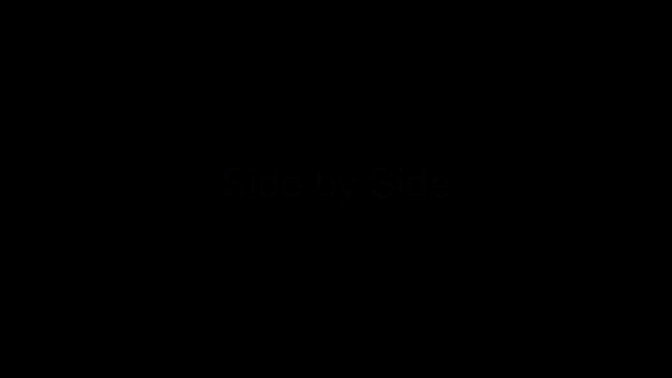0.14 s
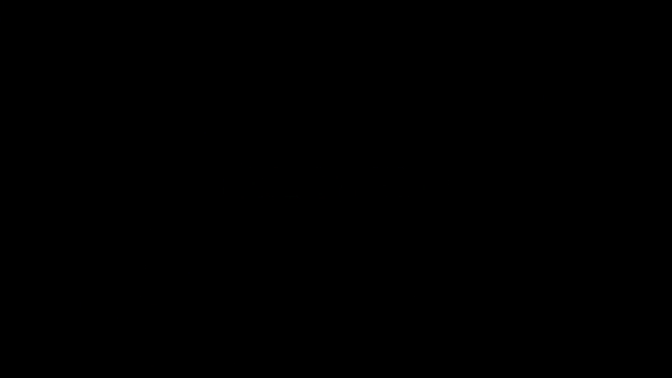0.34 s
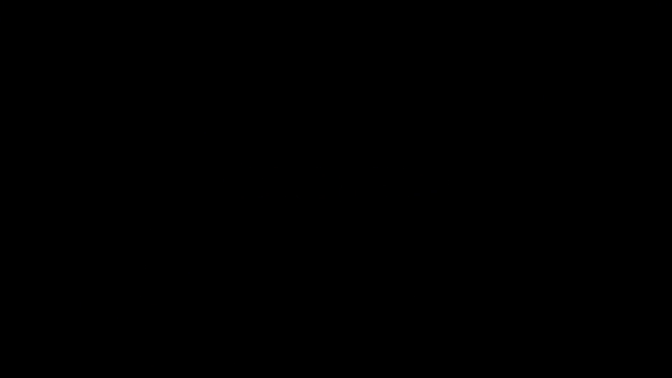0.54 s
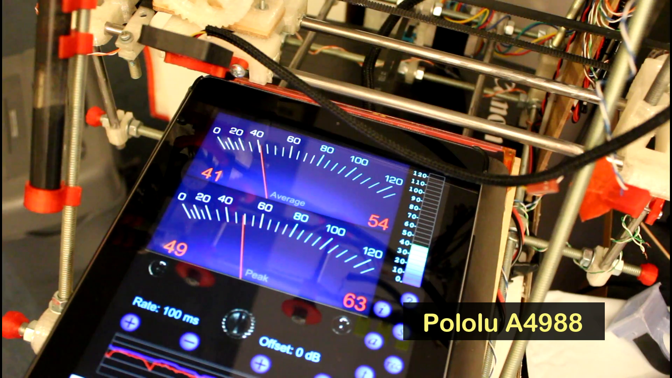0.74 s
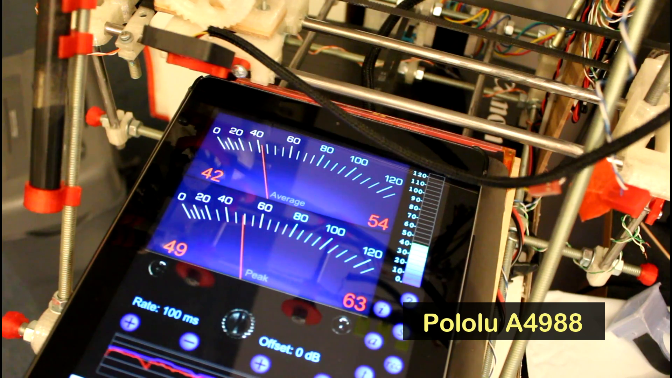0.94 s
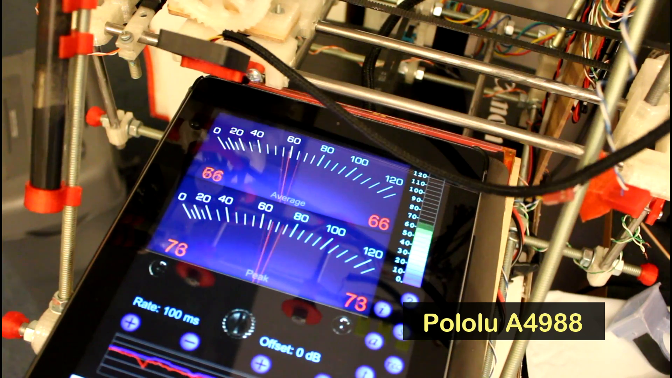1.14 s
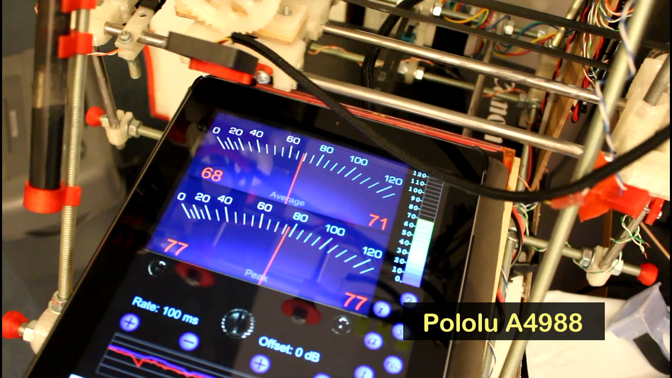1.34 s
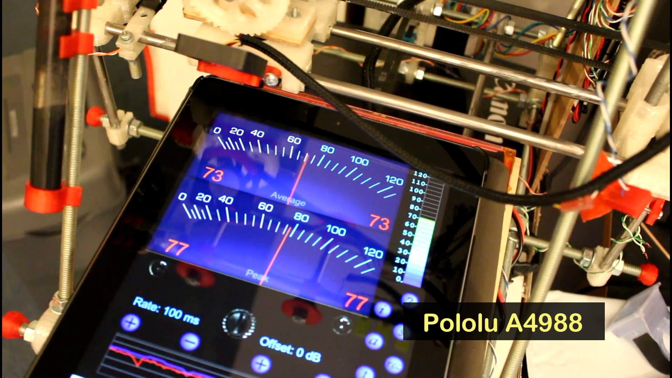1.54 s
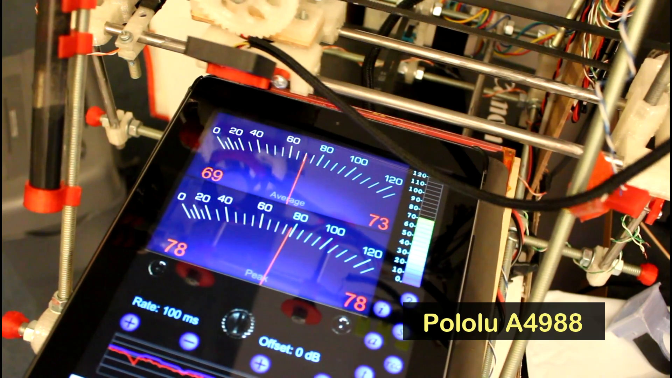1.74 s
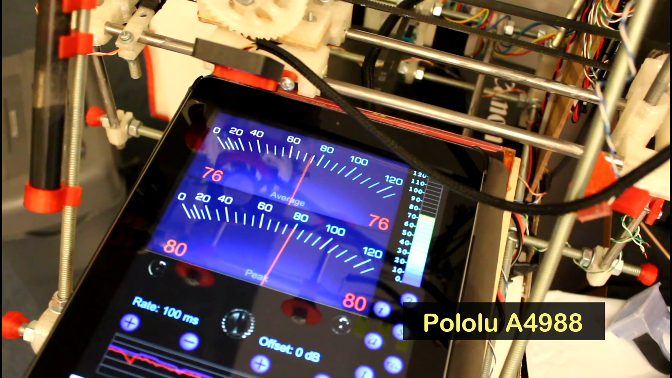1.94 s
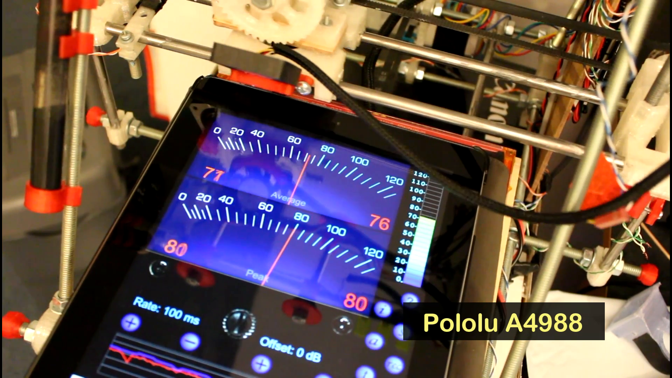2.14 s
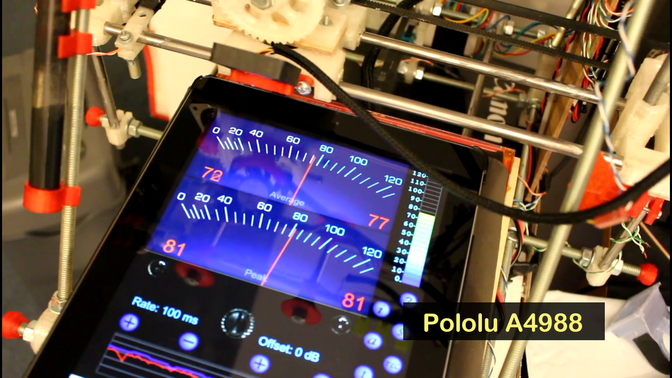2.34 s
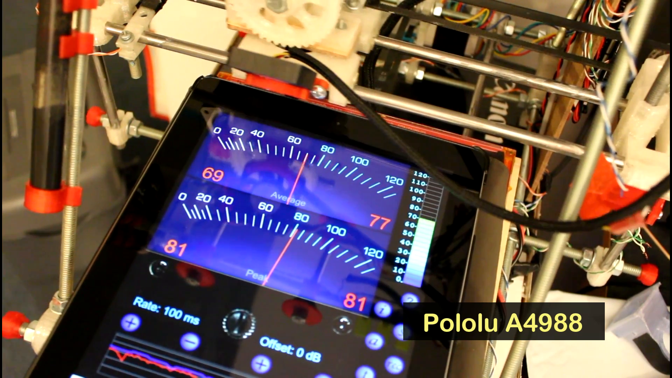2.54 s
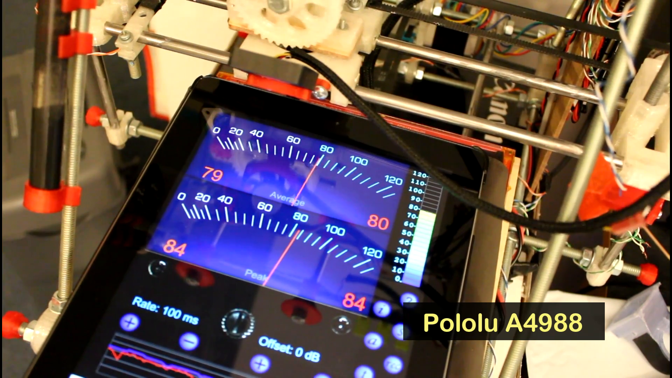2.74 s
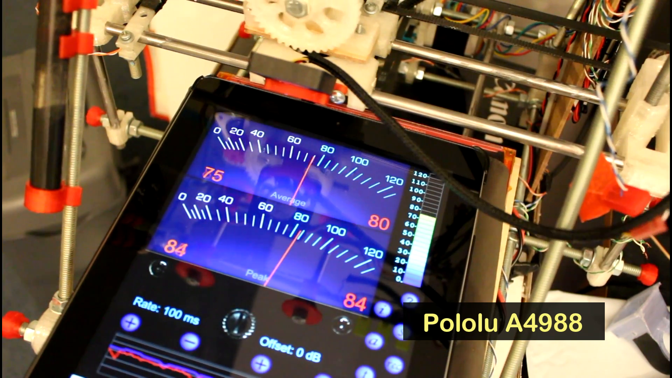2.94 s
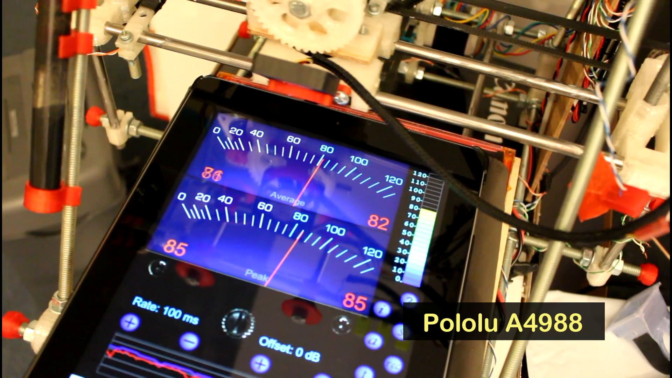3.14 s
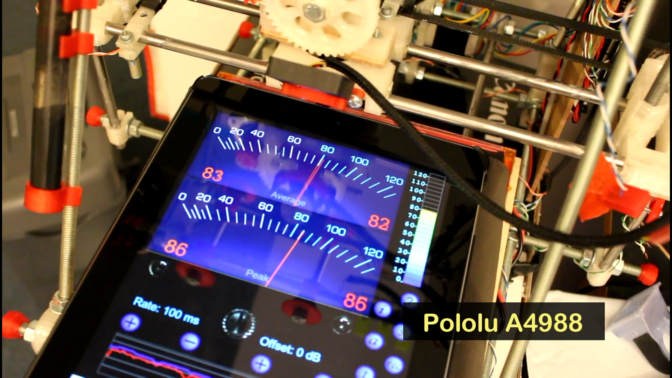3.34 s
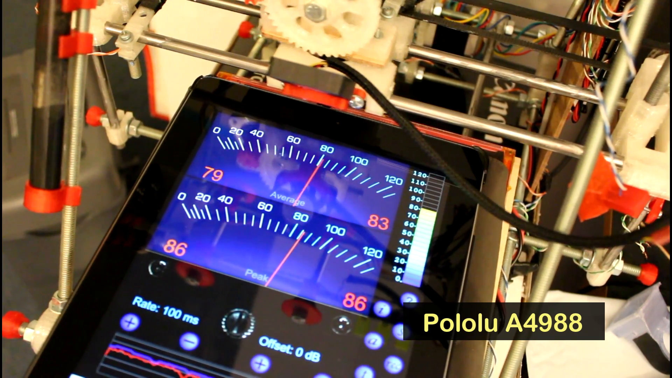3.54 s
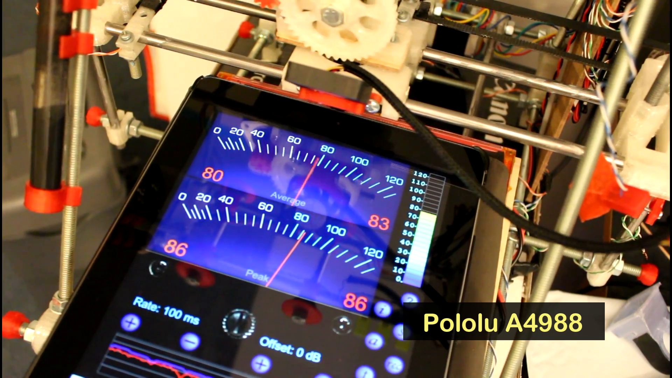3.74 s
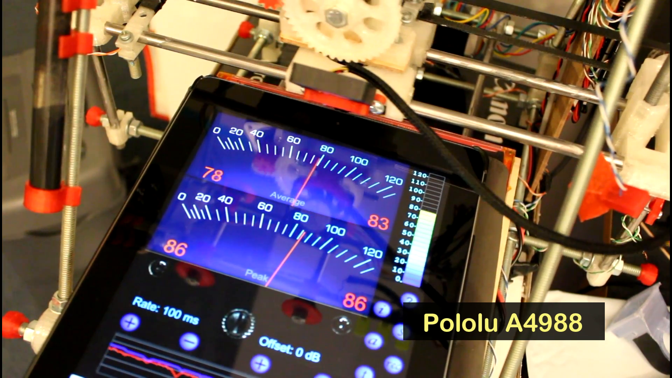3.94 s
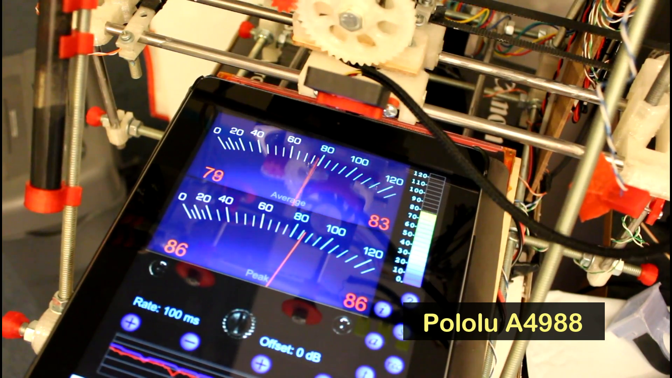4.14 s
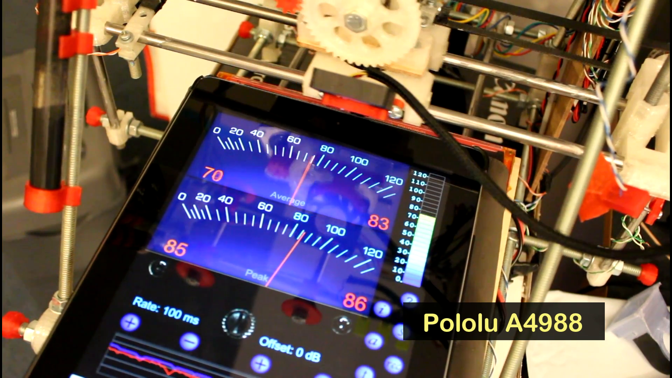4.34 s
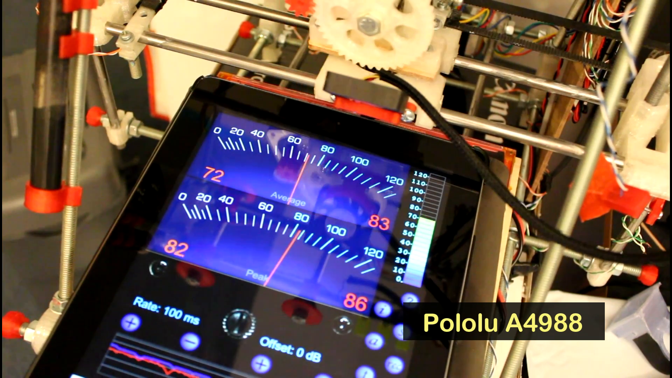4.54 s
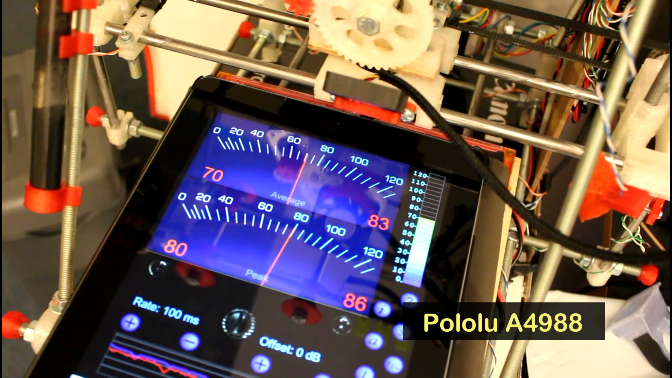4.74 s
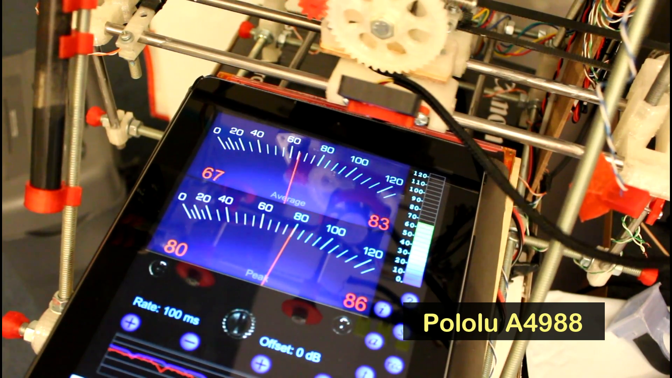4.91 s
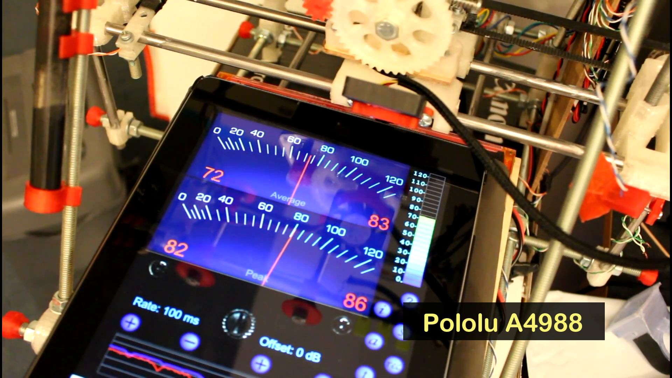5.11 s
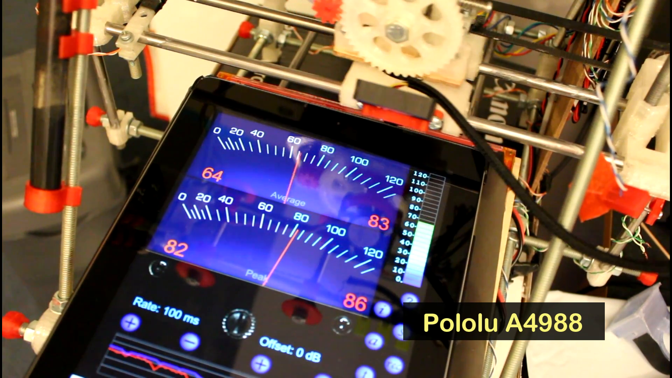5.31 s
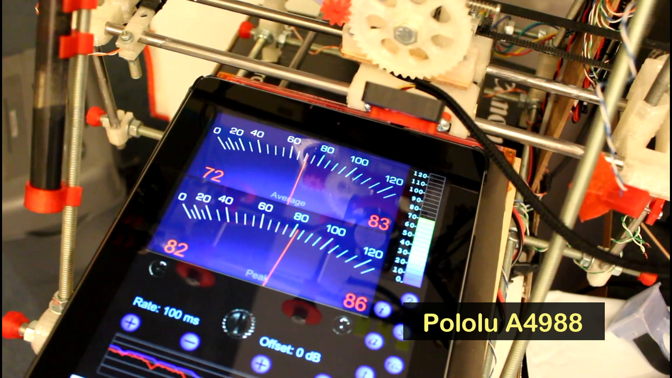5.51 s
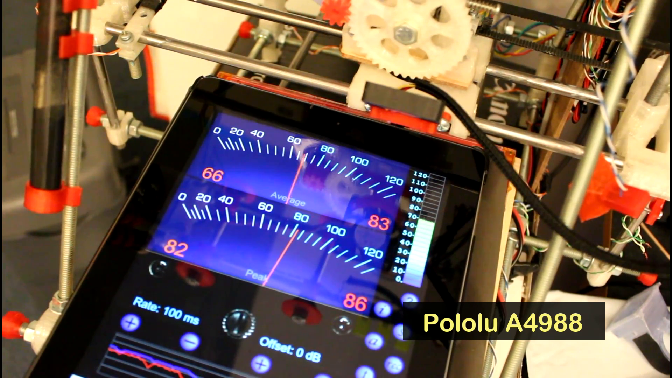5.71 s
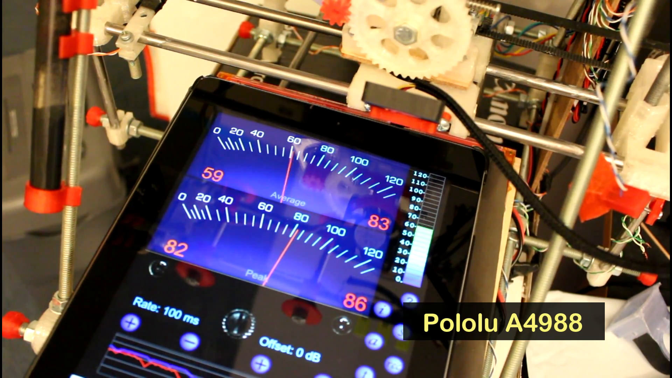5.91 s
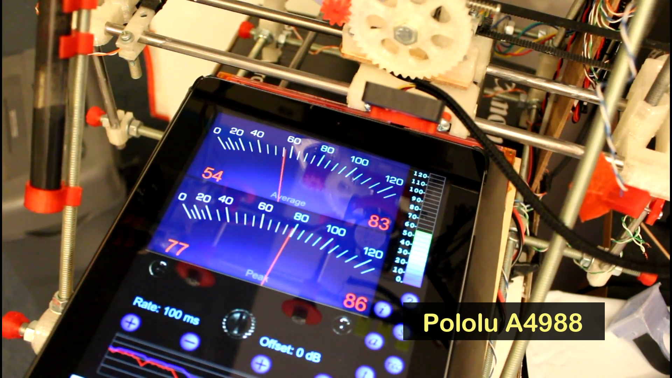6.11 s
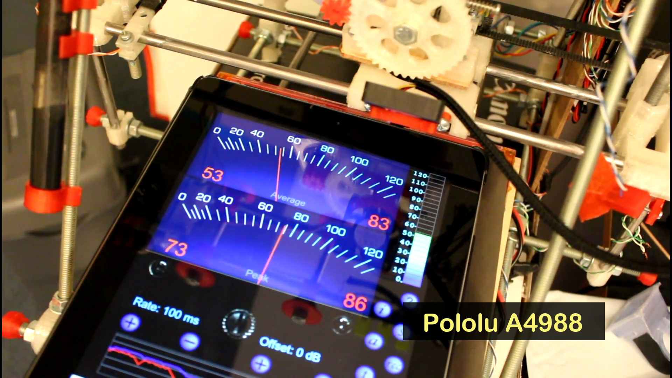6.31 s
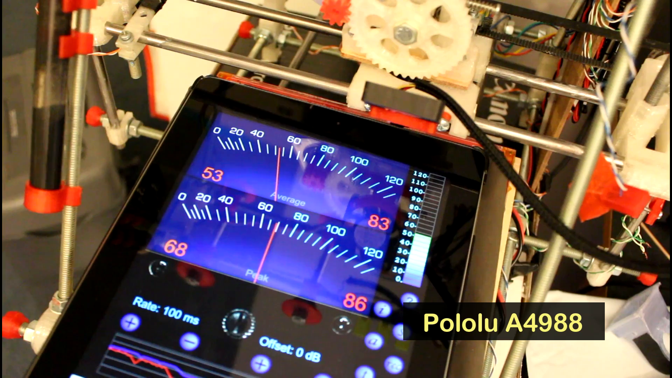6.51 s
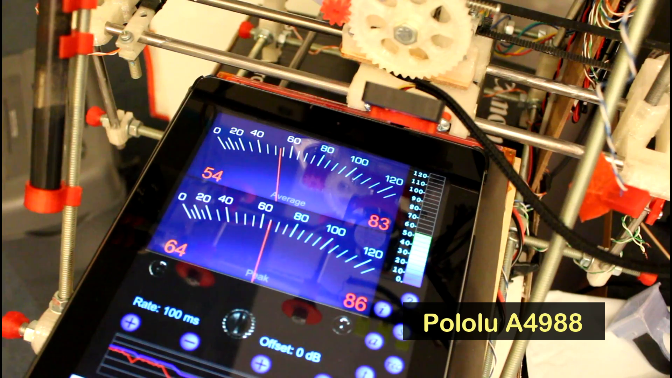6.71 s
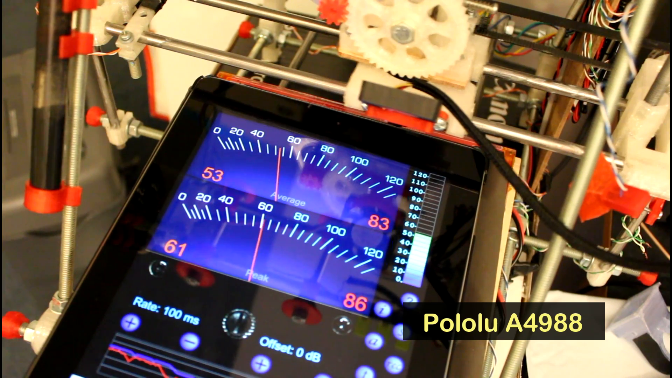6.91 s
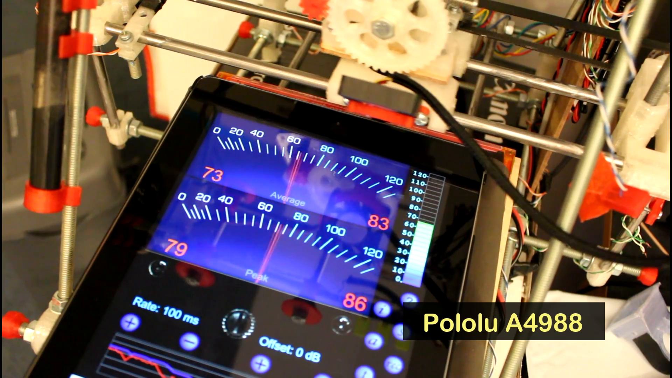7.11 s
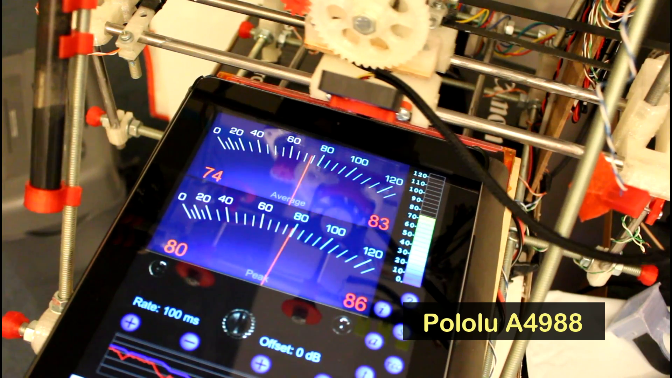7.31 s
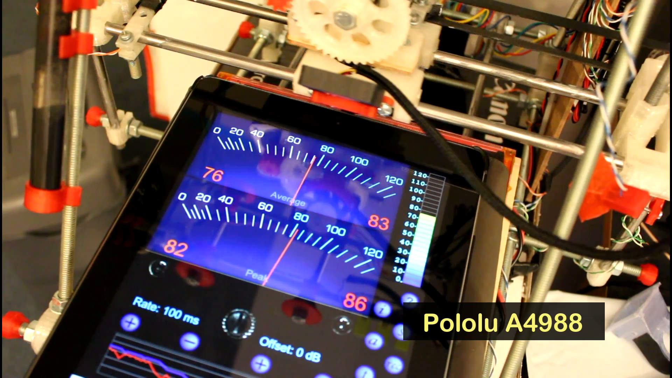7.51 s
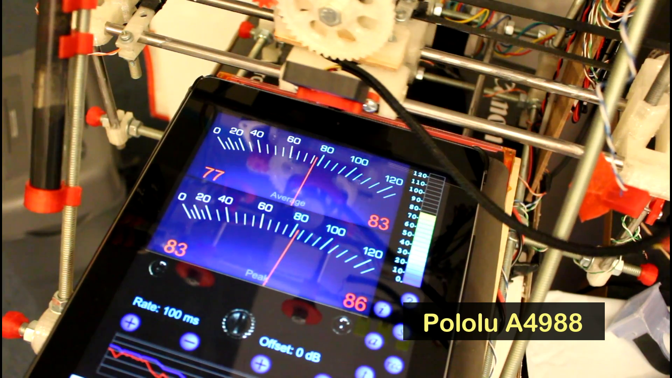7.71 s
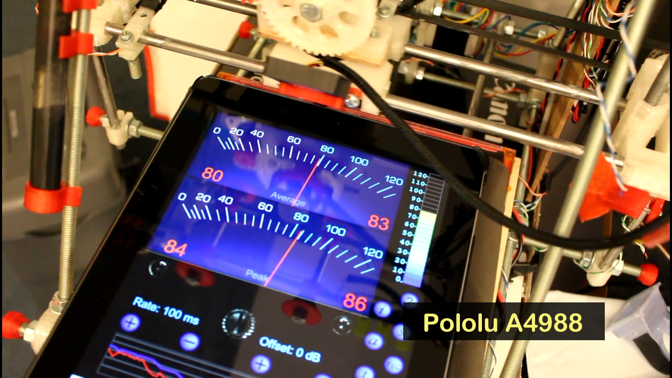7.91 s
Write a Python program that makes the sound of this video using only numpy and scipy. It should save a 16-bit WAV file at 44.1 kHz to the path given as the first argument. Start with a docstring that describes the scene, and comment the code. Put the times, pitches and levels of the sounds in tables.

```python
"""After a short silence a fan hums, a mouse clicks, and a stepper motor jogs a printer carriage on a rod frame.
Twelve short moves, a pause and one long move, still running at the end, each follow a click. Step-rate harmonics
sweep up through the frame's resonances and hold; the short moves sweep down again. The rotor shudders as speed
changes, bearings rattle as gated noise, and the motor driver hisses from the first move on.
A small room adds diffuse echoes in stereo."""
import sys
import numpy as np
from scipy import signal
from scipy.fft import rfft, irfft, next_fast_len
from scipy.io import wavfile
from scipy.ndimage import uniform_filter1d

SR = 44100
rng = np.random.default_rng(int(sys.argv[2]) if len(sys.argv) > 2 else 0)


def ratio(d):
    """dB to gain"""
    e = np.asarray(d, float) / 20
    return 10 ** e


def inscribe(sig):
    """Save sig as 16-bit PCM at rate SR to the path in sys.argv[1].

    A 1-D sig is mono; a 2-D sig holds one channel per row.
    Samples are clipped to [-1, 1] before scaling.
    """
    pcm = np.round(np.clip(np.atleast_2d(sig).T, -1, 1) * 32767)
    wavfile.write(sys.argv[1], SR, pcm.astype(np.int16))


N = 355446

# short moves; each leaves the carriage at a new place, where the frame passes the steps on differently:
# (button pressed [s], shudder at the start [dB], step tone [dB], second order [dB], fifth order [dB])
JOG_MOVES = [(0.9868, -46.5, -33.5, -45, -56.5), (1.316, -47.5, -34, -48.5, -60),
             (1.686, -51, -36, -52, -57), (2.0175, -51, -33, -52, -55.5), (2.423, -52, -35, -47, -55.5),
             (2.808, -51.5, -38, -46, -54), (3.1798, -50, -40.5, -47, -57),
             (3.5741, -50.5, -37.5, -47, -57), (3.9595, -47.5, -40.5, -45.5, -55.5),
             (4.367, -50, -40, -46, -56), (4.8259, -49.5, -42, -46.5, -61.5),
             (5.276, -49.5, -41, -45.5, -59.5)]
LONG_PRESS_S = 6.9416  # button pressed for the long move


def moves():
    """Motion schedule: start [s], time until braking [s] and first shudder [dB] of every move."""
    wait_s, jog_s, long_s = .0205, .215, 2.  # the motor turns wait_s after a press
    long_shudder_db = -50
    jogs = [(press_s + wait_s, jog_s, db) for press_s, db, *_ in JOG_MOVES]
    return jogs + [(LONG_PRESS_S + wait_s, long_s, long_shudder_db)]


def since_start():
    """Elapsed time: seconds since the latest move began, zero before the first."""
    t, starts = np.arange(N) / SR, np.array(moves())[:, 0]
    latest = np.maximum(np.searchsorted(starts, t) - 1, 0)
    return np.maximum(t - starts[latest], 0)


def speed(t):
    """Trapezoidal motion, as a share of full speed: a jerk, a ramp that settles on the steady run, a ramp down."""
    speed_up_s, settle_s, slow_down_s, jerk_share = .052, .015, .045, .15
    out = np.zeros(N)
    for start, run, _ in moves():
        up = jerk_share + (1 - jerk_share) * (t - start) / speed_up_s
        settle = 1 - .05 * np.exp(-np.maximum(t - start - speed_up_s, 0) / settle_s)
        down = 1 - (1 - jerk_share) * (t - start - run) / slow_down_s
        share = np.minimum(np.minimum(up, down), settle)
        out += share * (share >= jerk_share)
    return out


def place(t):
    """Position-dependent transmission: order levels [dB] fixed within each jog, gliding along the long move."""
    # along the long move: (time [s], step tone [dB], second order [dB], fifth order [dB])
    long_levels = [(7.05, -41.5, -47.5, -60), (7.25, -41, -48.5, -55), (7.57, -47, -51.5, -50.5),
                   (7.74, -41.5, -50.5, -45.5), (8.06, -44.5, -47.5, -46)]
    others_db, fifth_share = -7, .45
    jog = np.maximum(np.searchsorted(np.array(JOG_MOVES)[:, 0], t) - 1, 0)
    s, *long_columns = np.transpose(long_levels)
    jog_columns = np.transpose(JOG_MOVES)[2:]
    step_db, second_db, fifth_db = (np.where(t < LONG_PRESS_S, jog_column[jog], np.interp(t, s, long_column))
                                    for jog_column, long_column in zip(jog_columns, long_columns))
    # the other orders lie at a fixed distance from a mix of the step tone's and the fifth order's levels
    other_db = others_db + (1 - fifth_share) * step_db + fifth_share * fifth_db
    return step_db, second_db, fifth_db, other_db


def shape(x, points, peaks=()):
    """Spectral filtering: a (frequency [Hz], level [dB]) line with (frequency [Hz], width [Hz], level [dB]) humps."""
    size = next_fast_len(x.shape[-1])
    f = np.fft.rfftfreq(size, 1 / SR) + 1
    hz, db = np.transpose(points)
    line = ratio(np.interp(np.log(f), np.log(np.maximum(hz, 1)), db))
    humps = sum(ratio(d) / np.sqrt(1 + (2 * (f - c) / w) ** 4) for c, w, d in peaks)
    return irfft(rfft(x, size) * line * (1 + humps), size)[..., :x.shape[-1]]


def unit(x):
    """Normalisation to an rms of 1."""
    return x / np.sqrt(np.mean(x ** 2))


def walk(rate):
    """Band-limited random fluctuation of rms 1: held random values, rate of them a second, smoothed."""
    k = int(SR / rate)
    held = np.repeat(rng.standard_normal(N // k + 1), k)
    return unit(uniform_filter1d(held, k)[:N])


def frame(f, stiff=1):
    """Modal superposition: response of rods and plates at frequencies f, a stiff path plus resonances."""
    # resonant modes of the frame: (frequency [Hz], width [Hz], level [dB])
    modes = [(176, 72, 12), (262.8, 9, 19), (279.5, 6.8, 21.5), (338.3, 10, 17.5), (394.7, 10.6, 15),
             (593, 32, 9.5), (783, 9.4, 11), (971, 27, 13), (1245, 55, 9.5), (1356, 10, 9.5),
             (1429, 10.8, 16), (2364, 88, -4), (3260, 220, 1.5), (4437, 26, 16)]
    return stiff + sum(ratio(db) * 1j * f * w / (hz ** 2 - f ** 2 + 1j * f * w) for hz, w, db in modes)


def ring(x, stiff=1):
    """Forced vibration: the driving signal filtered by the frame's response."""
    size = next_fast_len(N + SR)
    return irfft(rfft(x, size) * frame(np.fft.rfftfreq(size, 1 / SR), stiff), size)[:N]


def motor(v, step_db, second_db, fifth_db, other_db):
    """Periodic forcing: harmonics of the step rate, up to 16 microsteps a step and beyond, drive the frame."""
    # other orders at full speed: (multiple of the step rate, level [dB])
    other_orders = [(3, -1.5), (4, -7), (6, -5.5), (7, -9.5), (8, -14.5), (9, -11), (10, -12), (11, -15),
                    (12, -20), (13, -26), (14, -11.5), (15, -11), (17, -11.5), (20, -12)]
    step_hz = 277.5  # at full speed
    microstep_db, microstep_start_db, microstep_fade_s = -60.5, 7, .25
    swell_s, swell_width_s, swell_peak_db = 7.58, .2, 8  # the seventh order swells along the long move

    phase = 2 * np.pi * np.cumsum(v) * step_hz / SR
    # the coil cycle (4 steps) and the belt teeth (10 steps) make the orders throb
    coil, tooth = np.sin(phase / 4), np.sin(phase / 10)
    # the microstep whine starts louder and settles
    micro_db = microstep_db + microstep_start_db * np.exp(-since_start() / microstep_fade_s)
    levels = [(1, step_db), (2, second_db), (5, fifth_db), (16, micro_db)]
    levels += [(k, db + other_db) for k, db in other_orders]
    swell_db = swell_peak_db * np.exp(-((np.arange(N) / SR - swell_s) / swell_width_s) ** 2)
    force = 0
    for k, db in levels:
        db = db + swell_db * (k == 7)
        wander_db = (1.2 if k in (1, 2, 3, 5, 16) else 2.5) * walk(15)
        throb = 1 + 0.18 * coil + (.35 if k in (5, 7) else .1) * tooth
        tone = np.sqrt(2) * np.sin(k * phase + 0.11 * walk(30) + 2 * np.pi * rng.random())
        # dividing by the response makes the levels hold behind the frame at full speed
        force = force + ratio(db + wander_db) * throb * tone / abs(frame(k * step_hz))
    # the tones stand clear only near full speed
    return ring(force * v ** 14.3), phase


def shudder(t, v):
    """Transient oscillation: the rotor swings on its magnetic spring as speed changes; slow microsteps buzz."""
    rotor_hz = 135.43  # the swing's partials are 2, 2.5 and 3 times this
    brake_db, buzz_db = -46.5, -43.5
    out = np.zeros(N)
    u = np.arange(int(.2 * SR)) / SR
    rough = unit(shape(rng.standard_normal(N), [(60, -22), (130, -3.0), (450, -0.5), (900, -37)]))
    for start, run, start_db in moves():
        # the swing climbs in pitch at a start and sinks at a stop:
        # (time [s], level [dB], rise [s], fall [s], glide [share of pitch], thud from and to [Hz])
        at_start = (start, start_db, .042, .02, .25, (110, 200))
        at_stop = (start + run - .005, brake_db, .012, .02, -.05, (200, 105))
        for s, db, rise_s, fall_s, glide, thud_hz in (at_start, at_stop):
            swell = np.where(u < rise_s, u / rise_s, np.exp(-(u - rise_s) / fall_s))
            turn = 2 * np.pi * rotor_hz * np.cumsum(1 + glide * np.minimum(u / rise_s - 1, 1)) / SR
            thud = np.cos(2 * np.pi * np.cumsum(np.interp(u, (0, .07), thud_hz)) / SR)
            swing = 0.42 * thud * np.sqrt(swell) + swell ** 2 * 0.99 * np.cos(2 * turn)
            upper = .5 * np.cos(2.5 * turn) + 0.45 * np.cos(3 * turn)
            swing = swing + swell * (upper + 0.6 * rough[:len(u)])
            rough = np.roll(rough, len(u))  # other noise for the next swing
            i = min(int(s * SR), N)
            out[i:i + len(u)] += (ratio(db) * swing)[:N - i]
    ramping = (v > 0) * (1 - v ** 6.5)
    buzz_band = signal.butter(2, (850, 3000), "band", fs=SR, output="sos")
    buzz = signal.sosfilt(buzz_band, rng.standard_normal(N))
    return ring(out * ratio(2.4 * walk(70)) + ratio(buzz_db) * ramping * buzz, stiff=0.085)


def belt_rumble(v):
    """Broadband excitation: noise that grows with belt speed shakes the frame."""
    # spectrum of the drive: (frequency [Hz], relative density [dB per Hz])
    rumble_line = [(40, -40), (80, -1), (130, -2.5), (300, -1.5), (700, 2.5), (1500, 0.5), (4500, -4.5),
                   (7000, -40)]
    return ratio(-59) * ring(unit(shape(rng.standard_normal(N), rumble_line)) * v ** 0.38)


def bearings(v, phase):
    """Impact noise: uneven ball knocks, modulated at the step and half-step rate, excite the bearing shells."""
    # spectrum of the knocks: (frequency [Hz], relative density [dB per Hz])
    rattle_line = [(880, 1.5), (1500, -23), (1640, -2), (2120, 1.5), (2770, -1), (4330, 0), (4690, -5.5),
                   (5830, 2), (6560, -9), (9750, -9), (11400, -14.5), (14200, -18.5), (16000, -32)]
    # resonances of the bearing shells: (frequency [Hz], width [Hz], level against the line [dB])
    shells = [(2815, 150, -5), (5020, 134, 2.5), (5746, 240, -7), (7250, 560, 0.5)]
    rattle_db, loosen_s = -48, .032
    bright_hz, bright_s = 4950, 0.051  # the top of the rattle builds up late in a move

    # the chatter lags behind the speed: the carriage must be under way
    lag = np.exp(-1 / (loosen_s * SR))
    loose = signal.lfilter([1 - lag], [1, -lag], v) * np.minimum(1.2 * v, 1)
    balls = rng.standard_normal(N) * ratio(2.5 * np.minimum(rng.exponential(size=N), 6))
    gate = 1 + .3 * np.sin(phase) + .25 * np.sin(2 * phase)
    rattle = unit(shape(balls * gate * ratio(1.3 * walk(30)), [(200, -45)] + rattle_line, shells))
    top = signal.sosfilt(signal.butter(2, bright_hz, "high", fs=SR, output="sos"), rattle)
    rattle = rattle - .7 * top * np.exp(-since_start() / bright_s)
    return rattle * ratio(rattle_db) * (loose ** 1.33 + ratio(-16.0) * (v > 0))


def mouse():
    """Impulsive excitation: each plastic snap is one damped ring in a burst of noise."""
    # the button let go: (time [s], level [dB])
    releases = [(1.1178, -30), (1.4496, -33), (1.733, -30.5), (3.315, -27.5), (3.678, -28.5),
                (4.9657, -27.5), (5.3838, -29.5), (7.098, -28)]
    press_db, press_hz, release_hz = -33.5, 3614, 4410
    out, t = np.zeros(N), np.arange(1000) / SR
    press_times = [row[0] for row in JOG_MOVES] + [LONG_PRESS_S]
    snaps = [(s, press_db, press_hz) for s in press_times] + [(s, db, release_hz) for s, db in releases]
    burst_band = signal.butter(2, (1800, 8000), "band", fs=SR, output="sos")
    envelope = np.exp(-t / 0.0039) * np.minimum(t / 0.00086, 1)
    for s, db, hz in snaps:
        burst = signal.sosfilt(burst_band, rng.standard_normal(len(t)))
        snap = (0.65 * burst + 0.27 * np.sin(2 * np.pi * hz * t)) * envelope
        i = int(s * SR)
        out[i:i + len(t)] += ratio(db) * snap
    return out


def room(x, t60_s=0.27):
    """Diffuse reverberation: exponentially decaying dense echoes of a small room, independent in each channel."""
    # (frequency [Hz], echo against direct sound [dB])
    echo_line = [(60, -17), (250, -14), (600, -13), (1200, -13), (4000, -7.5), (15000, -6.5)]
    t = np.arange(SR // 2) / SR
    tail = rng.standard_normal((2, len(t))) * np.exp(-np.log(1000) * t / t60_s) * (t > .003)
    tail = tail / np.sqrt(np.sum(tail ** 2, axis=1, keepdims=True))
    return signal.fftconvolve(shape(x, echo_line)[None], tail, axes=1)[:, :N]


def chopper(t, v):
    """Switching noise: current chopping in the driver hisses in narrow bands, which sink as it warms."""
    # bands of the warm driver: (frequency [Hz], width [Hz], level against the line [dB])
    hiss_bands = [(9120, 180, 7), (9600, 180, 18.5), (10280, 180, 11.5), (13700, 170, 12), (14700, 200, 1)]
    cold_pitch, warm_s = 1.018, 5.9  # pitch cold against warm, time to warm up
    holding_db, turning_db, fade_db_per_s = -60.5, 4.5, 12  # turning_db is added at full speed
    line = [(100, -60), (9000, -15.5), (16000, -22.0)]
    first_move_s = moves()[0][0]

    warm = shape(rng.standard_normal((2, N)), line, hiss_bands)
    cold_bands = [(hz * cold_pitch, w, db) for hz, w, db in hiss_bands]
    cold = shape(rng.standard_normal((2, N)), line, cold_bands)
    cold_share = np.clip(1 - (t - first_move_s) / warm_s, 0, 1)
    mid, side = np.sqrt(cold_share) * cold + np.sqrt(1 - cold_share) * warm
    hiss = (mid + 0.41 * np.array([[1], [-1]]) * side) / np.std(mid) * ratio(1.7 * walk(12))
    # the hiss fades from the last press on
    fade_db = fade_db_per_s * np.maximum(t - LONG_PRESS_S, 0)
    hiss_db = holding_db + (turning_db + 2.35 * walk(30)) * v - fade_db
    return hiss * ratio(hiss_db) * (t > first_move_s)


def fan():
    """Broadband flow noise with resonant humps; a separate side signal makes it wide in the middle range."""
    # (frequency [Hz], relative density [dB per Hz])
    fan_line = [(15, -57), (25, -17.5), (87, -4), (120, 0.5), (149, -10), (175, -2.5), (293, -5),
                (373, -14), (416, -10), (451, -8), (1560, -17), (2410, -17.5), (8590, -21.5), (9320, -21.5),
                (16000, -30.5)]
    # (frequency [Hz], width [Hz], level against the line [dB])
    fan_humps = [(117.5, 11.6, 1), (218, 18, 3), (304, 16, 2), (344.7, 15, 11), (414, 5.4, 10),
                 (2356, 33, 0), (3620, 280, -5), (6120, 75, 2)]
    # (frequency [Hz], side against mid [dB])
    side_line = [(60, -15), (110, -7), (200, -8.5), (380, -3), (700, 2), (1290, 4), (2380, 3), (4400, 1.5),
                 (8120, 0.5), (15000, 2)]
    fan_db = -53.5
    mid, side = shape(rng.standard_normal((2, N)), fan_line, fan_humps)
    wide = mid + np.array([[1], [-1]]) * shape(side, side_line)
    return wide / np.std(mid) * ratio(0.75 * walk(6.6)) * ratio(fan_db)


def steady_tones(t):
    """Pure tones: a mains hum and a thin whistle, as constant sinusoids."""
    # (frequency [Hz], rms level [dB])
    tones = [(119.9, -63), (15734.5, -82)]
    return sum(ratio(db) * np.sqrt(2) * np.sin(2 * np.pi * hz * t) for hz, db in tones)


def scene():
    """Superposition: printer and mouse, direct and echoed, over the background, all a little to the right."""
    t = np.arange(N) / SR
    v = speed(t)
    tones, phase = motor(v, *place(t))
    near = tones + shudder(t, v) + belt_rumble(v) + bearings(v, phase) + mouse()
    background = fan() + chopper(t, v) + steady_tones(t)
    return (near + room(near) + background) * ratio(np.array([[-.8], [.8]]))


def band_limit(x):
    """A steep low-pass at the top of the band."""
    return signal.sosfilt(signal.butter(12, 16270, fs=SR, output="sos"), x)


def record(dry):
    """Exponential gain recovery: silent until the recorder opens, then the level starts low and creeps up."""
    open_s, opening_db, creep_s = .7565, -3, 0.76
    t = np.arange(N) / SR - open_s
    gain = (t >= 0) * ratio(opening_db * np.exp(-np.maximum(t, 0) / creep_s))
    return band_limit(dry * gain)


dry = scene()
out = record(dry)
inscribe(out)
```